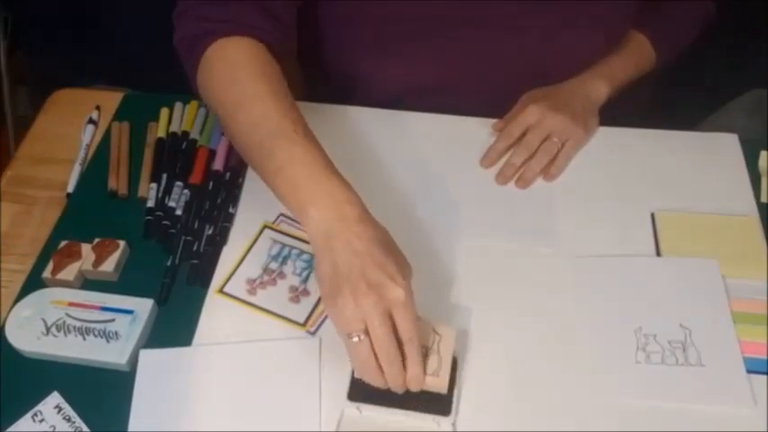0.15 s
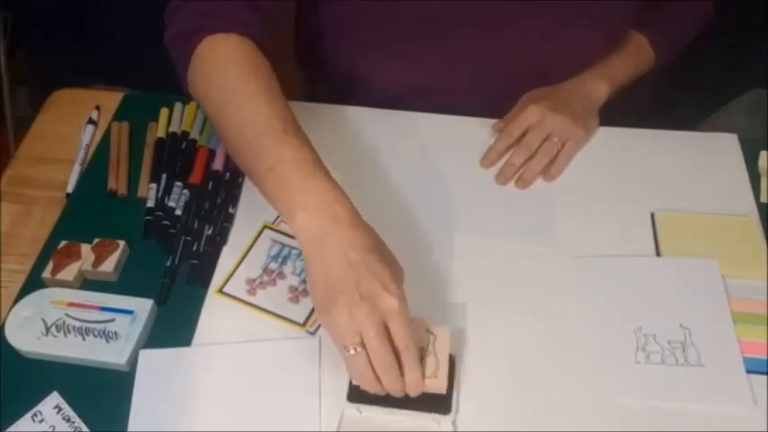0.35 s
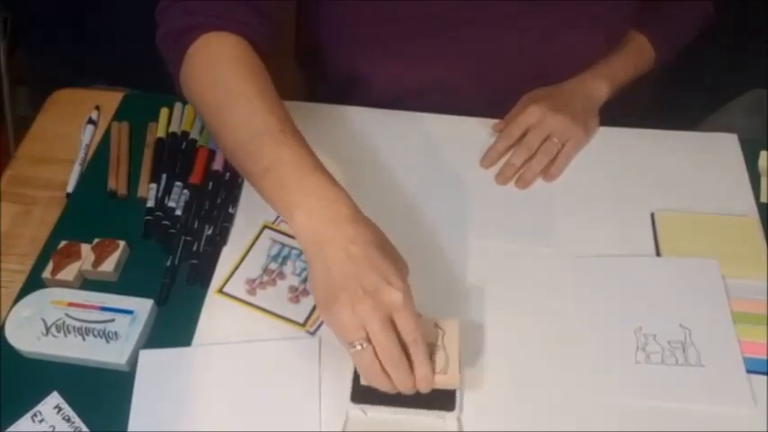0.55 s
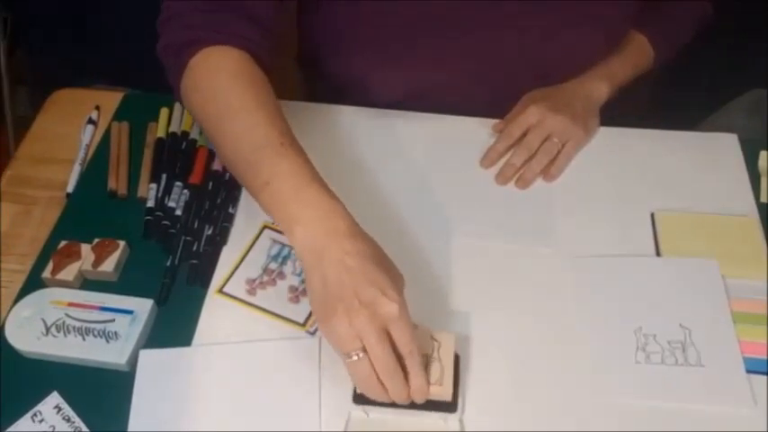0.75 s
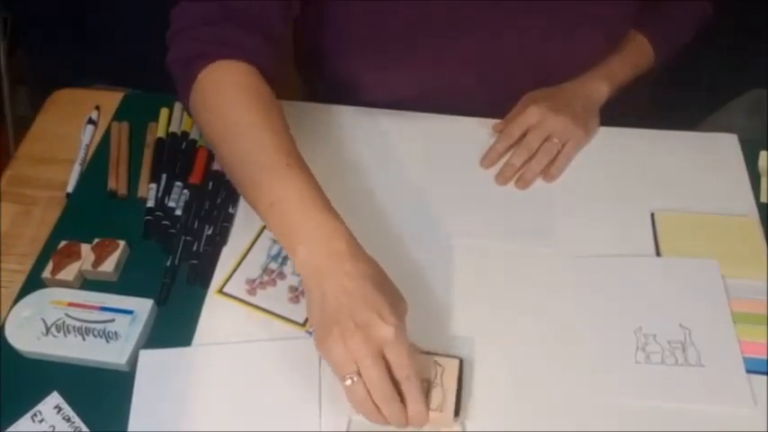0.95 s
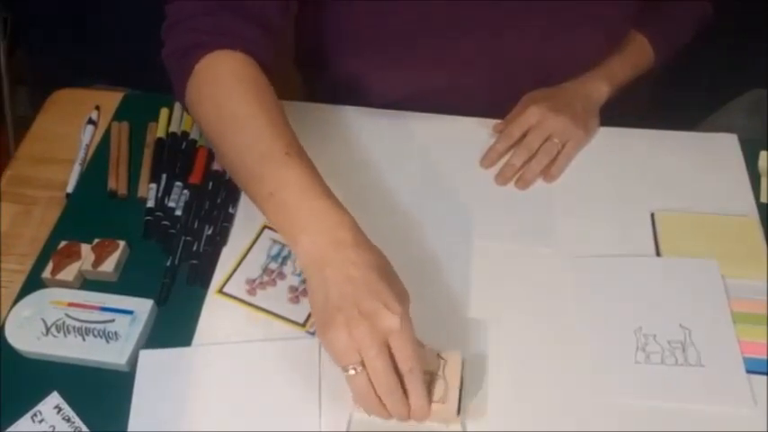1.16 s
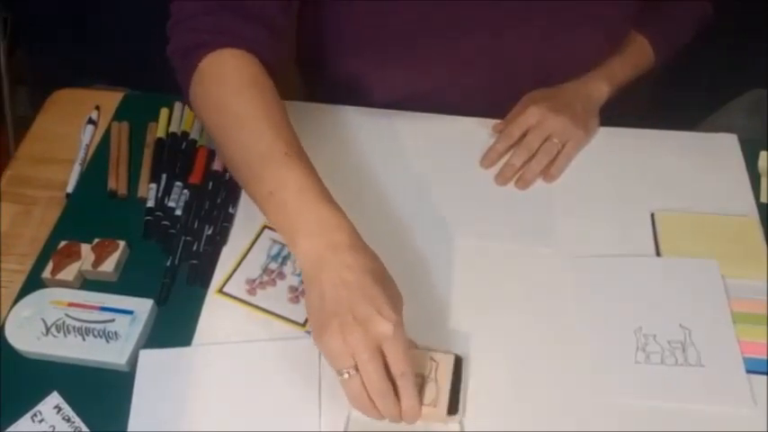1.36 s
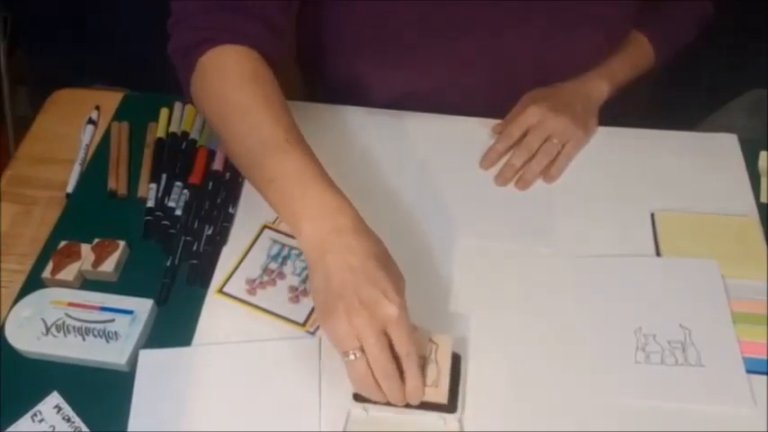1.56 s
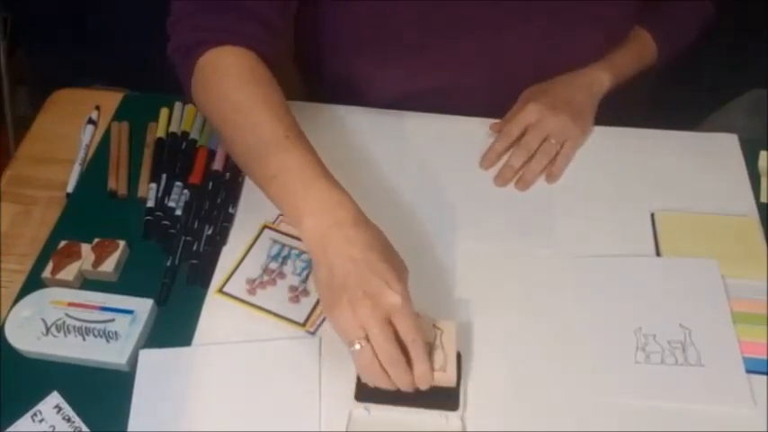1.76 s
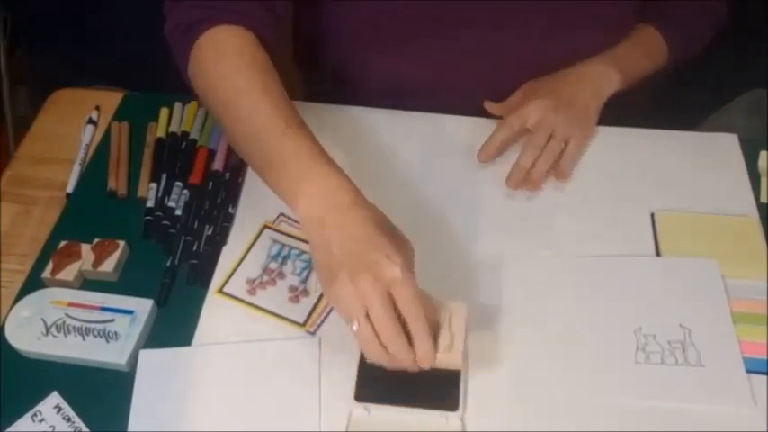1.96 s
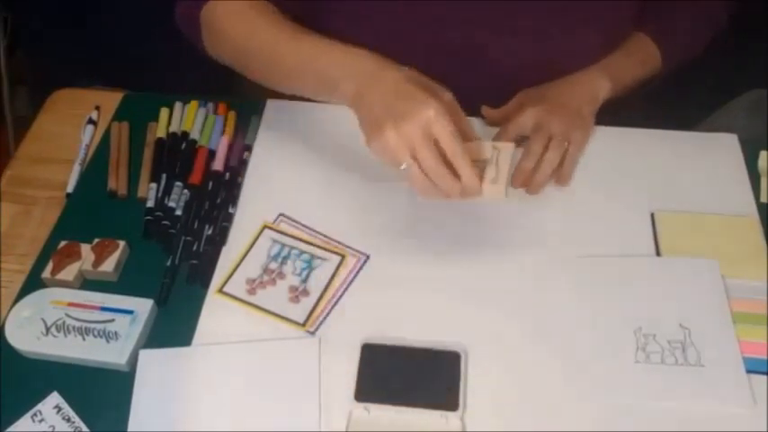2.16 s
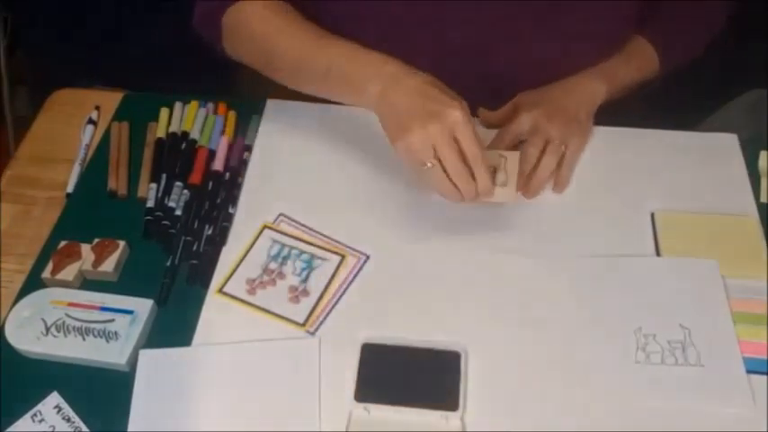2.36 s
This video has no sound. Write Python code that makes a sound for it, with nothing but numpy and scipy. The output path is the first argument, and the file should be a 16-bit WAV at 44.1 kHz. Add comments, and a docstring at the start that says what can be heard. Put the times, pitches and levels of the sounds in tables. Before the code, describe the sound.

A wooden rubber stamp knocks on an ink pad seven times, from the very start until about 1.7 seconds, roughly every 0.3 seconds and slightly quicker at the end. Each knock carries a low table thump, a light plastic clack and a tiny sticky crackle. A very faint arm rustle follows at around 2.2 seconds. The small room is quiet, with a low hum.

```python
"""Seven wooden knocks, each with a low boom: a wood-mounted rubber stamp is tapped onto an ink pad.
Each impact ticks on contact, excites the damped modes of the block and the pad's case, and flexes
the table top; the tacky rubber then peels off the wet pad in two short crackles of snapping ink.
A faint, brief treble hiss follows the last knock, and the arm draws back with a faint rustle.
A small quiet room adds reflections, rumble and hum."""
import sys
import numpy as np
from scipy import signal
from scipy.fft import rfft, irfft
from scipy.io import wavfile
from scipy.ndimage import uniform_filter1d

SR = 44100
rng = np.random.default_rng(int(sys.argv[2]) if len(sys.argv) > 2 else 0)


def store_pcm(level_fs):
    """Save levels as 16-bit WAV."""
    pcm = np.round(np.clip(level_fs, -1, 1) * 32767).astype(np.int16)
    wavfile.write(sys.argv[1], SR, np.atleast_2d(pcm).T)


N = 106854
T = np.arange(N) / SR
HZ = np.maximum(np.fft.rfftfreq(N, 1 / SR), 1)

# Blows of the stamp. Each row: start in seconds, boom level in dB, boom tilt in dB per octave,
# block pitch in Hz, then the levels in dB of block ring, case thud, case clack and contact tick.
TAPS = [(.0440, -14.5, 1, 710.5, -4.5, -14.5, -26.5, -32), (0.3365, -19, -3.5, 657, -13, -24, -51, -45),
        (0.633, -18, -1, 593, -24.5, -16.5, -19.5, -40), (.9237, -20, 4.5, 657, -27.5, -13, -16, -38.5),
        (1.2128, -18, 1.2, 612, -13, -22.5, -34, -45), (1.47, -19, 1.3, 638, -10, -33, -24, -43.5),
        (1.7005, -18, -2, 713, -12.5, -23.5, -19, -43.5)]
# Nudges of the wood in the hand. Each row: start in seconds, block level in dB, boom level in dB.
NUDGES = [(1.316, -45, -59), (1.573, -42, -53), (2.092, -61.5, -55)]
# Two peeling crackles per tap; the final row is a faint, brief treble hiss after the last knock.
# Each row: start in seconds, swell in seconds, level in dB, tilt in dB per octave.
CRACKLES_AND_HISS = [(0.078, 0.0092, -28, 0), (0.103, .006, -32.5, -3.5), (.3690, 0.0072, -31, -3.5),
                     (0.3962, 0.004, -36, -2.5), (0.6645, 0.013, -31.5, -1.5), (0.6925, 0.0017, -36, 0),
                     (0.956, 0.0036, -30, -5), (0.9816, 0.0054, -41, 1), (1.2442, 0.0037, -33, -4.5),
                     (1.2722, 0.0031, -39.5, 1.5), (1.501, 0.0045, -31, -3.5), (1.5268, 0.0045, -36, -0.5),
                     (1.7325, 0.01, -33, .5), (1.7587, 0.0056, -36, 1), (1.8300, .02, -65, 12.5)]
# Bending modes of the table top. Each row: frequency in Hz, level in dB, T60 in seconds.
TABLE_FLEX_MODES = [(43.93, -4.5, 0.33), (60.6, 4, 0.087), (94.34, -1.5, 0.082), (158.7, -7, 0.054)]
# Resonant peaks that colour each knock and ring briefly after it.
# Each row: frequency in Hz, gain in dB, T60 in seconds (capped by resonate).
KNOCK_PEAKS = [(159.7, -1, 0.083), (219, 4.5, 0.12), (254, 0.5, 0.44), (310.4, -2.5, 0.26),
               (408, 15.5, 0.203), (467.7, 11, 0.25), (539, 3.5, 0.49), (652.3, -11, 0.071),
               (645.8, -11, 0.48), (794, 0, 0.066), (900, 1.5, 0.084), (1093, -3.5, .2), (1132, -4, 0.073),
               (1250, 5, 0.28)]
# Modes of the pad's plastic case. Each row: frequency in Hz, gain in dB, T60 in seconds.
CASE_MODES = [(1147, -4.5, .1), (1417, -0.5, 0.31), (1910, -14.5, 0.053), (1979, 1.5, .13),
              (2226, 1.5, .04), (2768, -3, 0.24), (3520, -4.5, 0.081), (3860, 2.5, 0.18)]
# Reflections from near walls and furniture. Each row: delay in seconds, gain in dB.
ECHOES = [(.0031, -14.5), (.0075, -10.5), (.0107, -8.5), (.0135, -17), (.0189, -9), (.0235, -12),
          (.0303, -12.5), (.0385, -13.5)]
# Reverberation time of the room. Each row: frequency in Hz, T60 in seconds.
ROOM_T60 = [(100, 0.66), (300, .3), (800, .24), (2000, 0.18), (5000, 0.2), (14000, 0.17)]
# Spectral envelopes of the noises. Each row: frequency in Hz, relative spectral density in dB.
TICK_SPECTRUM = [(50, -25.5), (300, 0.5), (900, -5.5), (1600, 14), (2400, 3), (4500, -8), (8000, -14),
                 (14000, -18)]
CLATTER_SPECTRUM = [(40, -49), (120, -18.5), (220, -6.5), (450, -1), (950, 1), (1250, -1.5), (1700, -14.5),
                    (2100, -17.5), (3000, -31.5), (6000, -43)]
CRACKLE_SPECTRUM = [(50, -34), (300, 0), (700, -7.5), (1300, 0), (1650, -5.5), (2150, -2), (2800, -7),
                    (3900, -7), (5500, -16.5), (8000, -20.5), (11000, -25.5), (14000, -28)]
ROOM_SPECTRUM = [(60, -9), (200, -10), (600, -3.5), (1500, 0.5), (4000, -2.5), (8000, -1.5), (14000, 2.5)]
FLOOR_SPECTRUM = [(20, -22), (40, -7), (60, 2.5), (85, -1.5), (125, -5.5), (156, -1.5), (190, -11),
                  (240, -6.5), (300, -8.5), (380, -18), (480, -20), (800, -24), (1250, -33), (1520, -28.5),
                  (2100, -38), (5000, -45.5), (9500, -48.5), (12800, -42), (15000, -37.5)]
RUSTLE_SPECTRUM = [(500, 2), (2000, -8), (4500, -1.5), (9000, 0), (14000, 0)]

SQUASH_S = .0018   # the rubber gives before the wood takes the blow
TICK_LEAD_S, THUD_LAG_S, CLACK_LAG_S = .0021, .0024, .00088
BLOCK_RISE_S, BLOCK_T60_S, NUDGE_HZ = .00064, .02, 616
PUSH_DB, CLATTER_DB = 11, -14   # relative to the boom and to the clack
CLICKS_PER_S, CLICK_SPREAD_DB = 9800, -1
CRACKLE_ECHO_DB, ROOM_SEND_DB, BOOM_SEND_DB = -11.5, -7.5, -5.5
FLOOR_DB, HUM_DB, HUM_HZ = -64, -63.5, 58
RUSTLE_S, RUSTLE_WIDTH_S, RUSTLE_DB = 2.159, .077, -71.5
THRESHOLD_DB, CUT_SHARE, ATTACK_S, RELEASE_DB_PER_S, MAKEUP_DB = -38, .2, .0076, 6.5, 2.5


def knocks():
    """Impact excitation: block and case ring briefly, in shares set by how the stamp lands."""
    out = sum(from_db(db) * ring(s, NUDGE_HZ, BLOCK_RISE_S, BLOCK_T60_S) for s, db, _ in NUDGES)
    for start, _, _, block_hz, block_db, thud_db, clack_db, _ in TAPS:
        blow = start + SQUASH_S
        out += from_db(block_db) * ring(blow, block_hz, BLOCK_RISE_S, BLOCK_T60_S)
        out += from_db(thud_db) * ring(blow + THUD_LAG_S, hz=291.2, rise=.0015, t60=.029)
        out += from_db(clack_db) * ring(blow + CLACK_LAG_S, hz=985, rise=.0011, t60=.013)
    return out


def table_boom(start, tilt_db=0):
    """Modal superposition: the table top flexes, neighbouring modes swinging in opposite directions."""
    t = since(start)
    pivot_hz = TABLE_FLEX_MODES[1][0]
    out = 0
    for k, (hz, db, t60) in enumerate(TABLE_FLEX_MODES):
        amplitude = (-1) ** (k + 1) * from_db(db + tilt_db * np.log2(hz / pivot_hz))
        out += amplitude * np.sin(2 * np.pi * hz * t) * fade(t, t60)
    return out


def after_ring(knock):
    """Resonance: peaks driven by the knock and the blow's pulse colour it and ring briefly after it."""
    push = sum(from_db(boom_db + PUSH_DB) * struck(start + SQUASH_S, rise=.0003064, t60=.00284)
               for start, boom_db, *_ in TAPS)
    return resonate(knock + push, KNOCK_PEAKS)


def contact_ticks():
    """Contact noise: rubber meets damp felt in a short, soft, broadband slap."""
    envelope = sum(from_db(tick_db) * struck(start - TICK_LEAD_S, rise=.0045, t60=.1)
                   for start, *_, tick_db in TAPS)
    return envelope * noise(TICK_SPECTRUM)


def case_clatter():
    """Intermittent contact: the case chatters against the table in proportion to its clack."""
    envelope = sum(from_db(clack_db + CLATTER_DB) * struck(start, rise=.006, t60=.13)
                   for start, *_, clack_db, _ in TAPS)
    return envelope * noise(CLATTER_SPECTRUM)


def crackles_and_hiss():
    """Shot noise: bursts of random clicks make each peel's two crackles, and also one faint late hiss."""
    sizes = from_db(CLICK_SPREAD_DB * np.minimum(rng.exponential(1, N), 3))
    signs = rng.choice([-1, 1], N)
    clicks = sizes * signs * (rng.random(N) < CLICKS_PER_S / SR)
    out = 0
    for start, swell, db, tilt_db in CRACKLES_AND_HISS:
        rise = np.minimum(since(start) / swell, 1) ** .38
        decay = fade(since(start + swell), t60=.023)
        out += from_db(db) * rise * decay * coloured(clicks, CRACKLE_SPECTRUM, tilt_db)
    return out


def echoes(x, cutoff_hz=8800):
    """Early reflection: near surfaces return delayed, slightly dulled copies."""
    dull = butterworth(x, 1, cutoff_hz, "low")
    return sum(from_db(db) * np.interp(T - delay, T, dull, left=0) for delay, db in ECHOES)


def reverberation(x):
    """Diffuse field: the room responds as octave bands of noise, each dying at its own rate."""
    tail = 0
    for low_hz in 60 * 2.0 ** np.arange(8):
        centre_hz = low_hz * np.sqrt(2)
        band = butterworth(rng.standard_normal(N), 2, [low_hz, 2 * low_hz], "band")
        envelope = struck(start=.003, rise=.002, t60=at_hz(ROOM_T60, centre_hz))
        tail += band * from_db(at_hz(ROOM_SPECTRUM, centre_hz)) * envelope
    return signal.fftconvolve(x, tail / np.sqrt(np.sum(tail ** 2)))[:N]


def arm_rustle():
    """Friction noise: a faint rustle swells and fades as the arm draws back."""
    envelope = np.exp(-((T - RUSTLE_S) / RUSTLE_WIDTH_S) ** 2)
    return from_db(RUSTLE_DB) * envelope * noise(RUSTLE_SPECTRUM)


def background():
    """Stationary noise floor: room rumble and hiss, with a low mains hum."""
    hum = from_db(HUM_DB) * rms_one(np.sin(2 * np.pi * HUM_HZ * T))
    return from_db(FLOOR_DB) * noise(FLOOR_SPECTRUM) + hum


def gain_control(x):
    """Compression: the gain drops by a share of the excess over a threshold and slowly recovers."""
    power = np.abs(uniform_filter1d(x[0] ** 2, size=256))
    cut_db = CUT_SHARE * np.maximum(10 * np.log10(power + 1e-12) - THRESHOLD_DB, 0)
    recovery_db = RELEASE_DB_PER_S * T
    held_db = np.maximum.accumulate(cut_db + recovery_db) - recovery_db
    pole = np.exp(-1 / (ATTACK_S * SR))
    return x * from_db(MAKEUP_DB - signal.lfilter([1 - pole], [1, -pole], held_db))


def resonate(x, peaks, max_t60=.32):
    """Parallel resonance: each two-pole filter peaks at its listed gain."""
    out = 0
    for hz, db, t60 in peaks:
        radius = fade(1 / SR, min(t60, max_t60))
        zeros = (1 - radius ** 2) / 2 * np.array([1, 0, -1])
        feedback = [1, -2 * radius * np.cos(2 * np.pi * hz / SR), radius ** 2]
        out += from_db(db) * signal.lfilter(zeros, feedback, x + 1e-18)
    return out


def ring(start, hz, rise, t60):
    """Damped oscillation: a softly struck mode swells smoothly from rest."""
    t = since(start)
    return np.sin(2 * np.pi * hz * t) * (1 - np.exp(-t / rise)) * struck(start, rise, t60)


def struck(start, rise, t60):
    """Impact envelope: quick rise, exponential decay; times in seconds."""
    t = since(start)
    return (1 - np.exp(-t / rise)) * fade(t, t60)


def fade(t, t60):
    """Exponential decay, by 60 dB in t60 seconds."""
    return np.exp(-np.minimum(np.log(1000) * t / t60, 60))


def since(start):
    """Elapsed time, zero before the start."""
    return np.maximum(T - start, 0)


def noise(spectrum):
    """Gaussian noise of a given spectrum, at unit rms."""
    return coloured(rng.standard_normal(N), spectrum)


def coloured(x, spectrum, tilt_db=0):
    """Spectral shaping with a tilt per octave, at unit rms."""
    gain = from_db(at_hz(spectrum, HZ) + tilt_db * np.log2(HZ))
    return rms_one(irfft(rfft(x) * gain, N))


def butterworth(x, order, hz, kind):
    """Filtering with a maximally flat passband."""
    return signal.sosfilt(signal.butter(order, hz, kind, fs=SR, output="sos"), x)


def at_hz(points, hz):
    """Interpolation on a log-frequency axis."""
    frequencies, values = np.array(points).T
    return np.interp(np.log(hz), np.log(frequencies), values)


def rms_one(x):
    """Normalisation to unit rms."""
    return x / np.sqrt(np.mean(x ** 2) + 1e-20)


def from_db(db):
    """Decibels to amplitude ratio."""
    return 10 ** (np.asarray(db) / 20)


def scene():
    """Superposition: direct sound, reflections and background add in one channel."""
    knock = knocks()
    boom = sum(from_db(db) * table_boom(start, tilt_db) for start, db, tilt_db, *_ in TAPS)
    boom += sum(from_db(db) * table_boom(start) for start, _, db in NUDGES)
    crackle = contact_ticks() + case_clatter() + crackles_and_hiss()
    direct = knock + boom + crackle + resonate(crackle, CASE_MODES)
    early = echoes(knock + from_db(CRACKLE_ECHO_DB) * crackle)
    radiated_boom = butterworth(boom, order=2, hz=130, kind="high")
    late = reverberation(from_db(ROOM_SEND_DB) * (knock + crackle) + from_db(BOOM_SEND_DB) * radiated_boom)
    return (direct + after_ring(knock) + early + late + background() + arm_rustle())[None]


def record(dry):
    """Band limiting and gentle compression: the deepest rumble and the highest treble are cut."""
    thinned = butterworth(dry, order=2, hz=14, kind="high")
    lowpass = signal.ellip(10, .2, 70, 14250, fs=SR, output="sos")
    return signal.sosfilt(lowpass, gain_control(thinned))


dry = scene()
out = record(dry)
store_pcm(out)
```